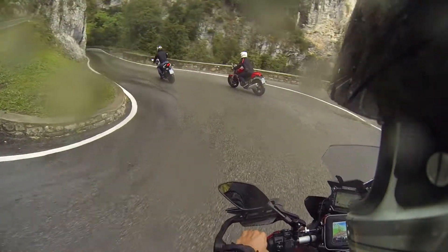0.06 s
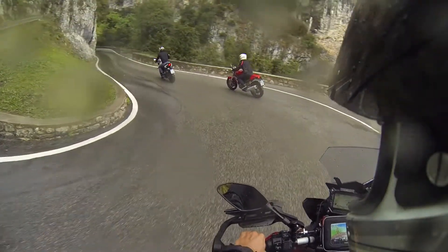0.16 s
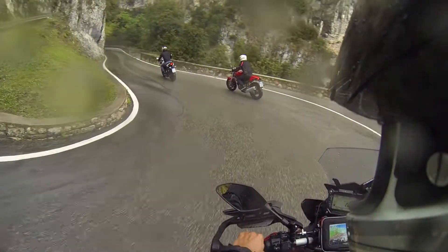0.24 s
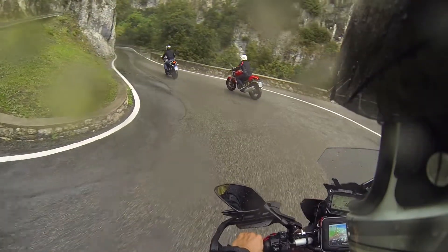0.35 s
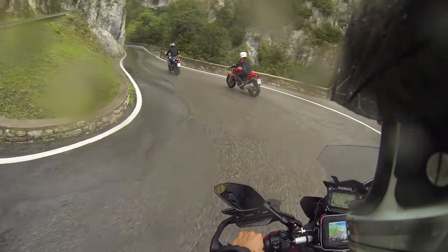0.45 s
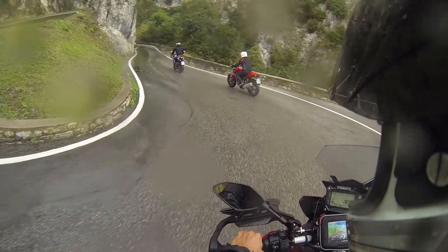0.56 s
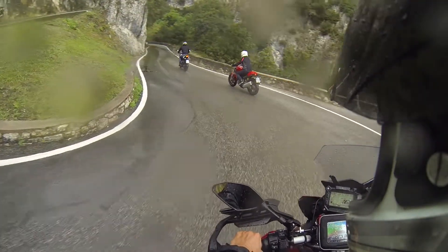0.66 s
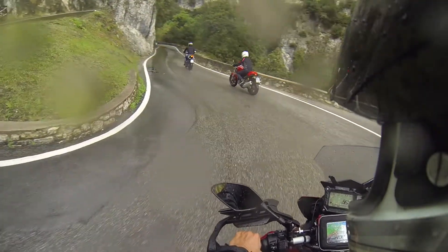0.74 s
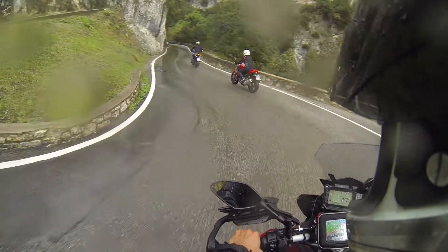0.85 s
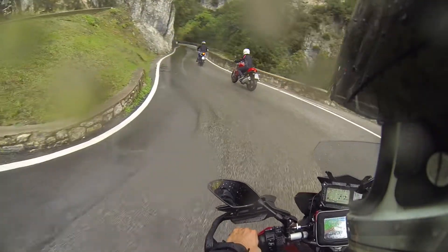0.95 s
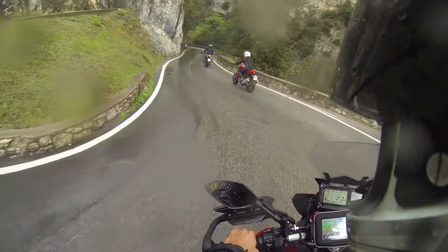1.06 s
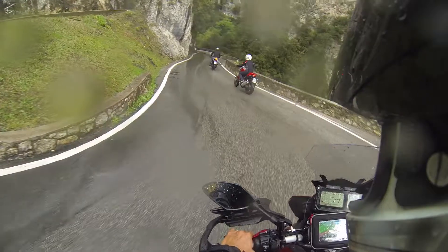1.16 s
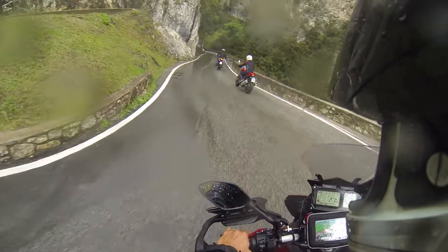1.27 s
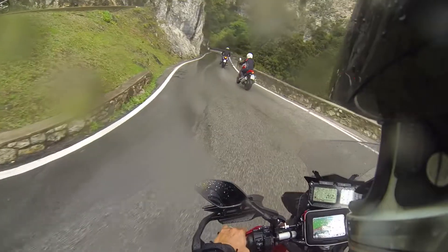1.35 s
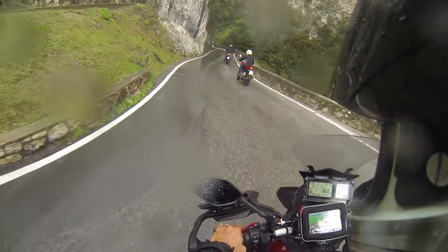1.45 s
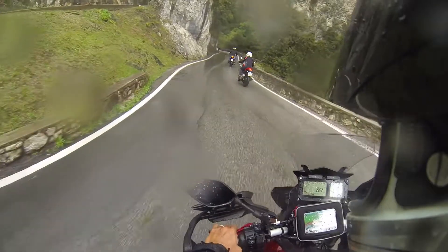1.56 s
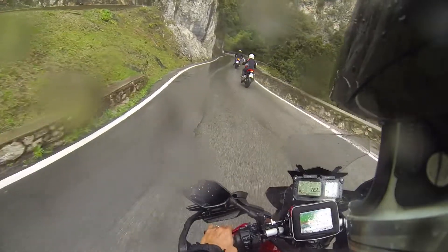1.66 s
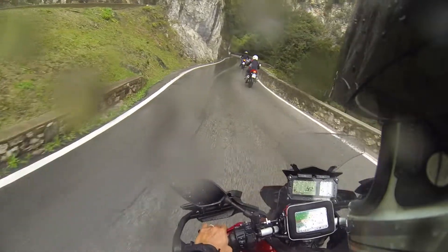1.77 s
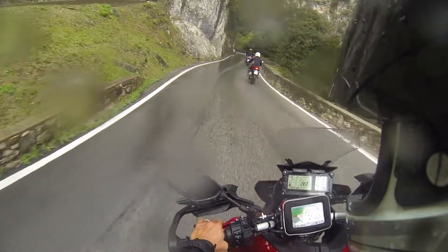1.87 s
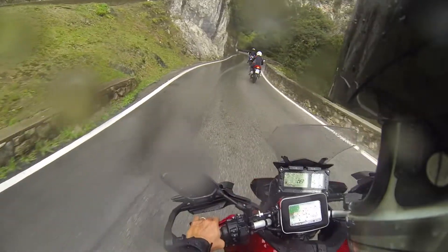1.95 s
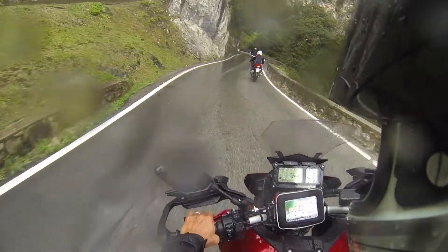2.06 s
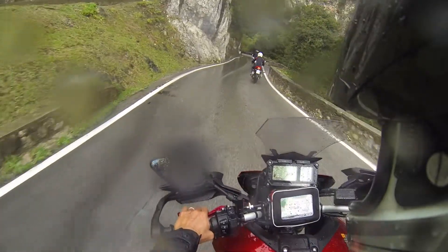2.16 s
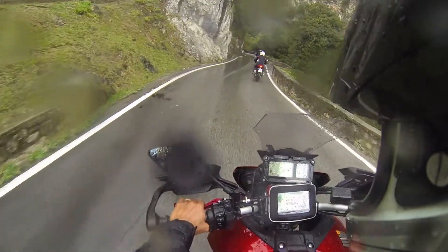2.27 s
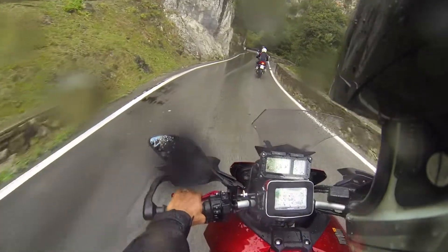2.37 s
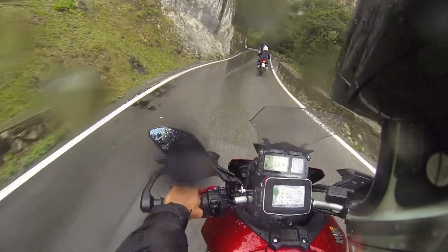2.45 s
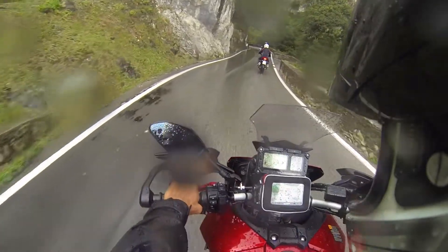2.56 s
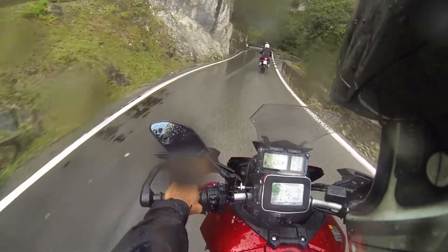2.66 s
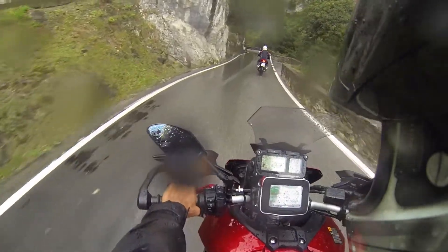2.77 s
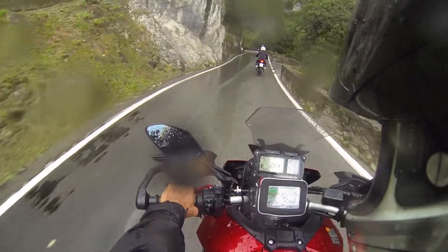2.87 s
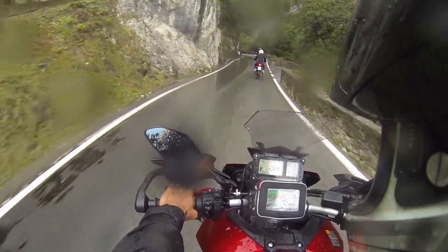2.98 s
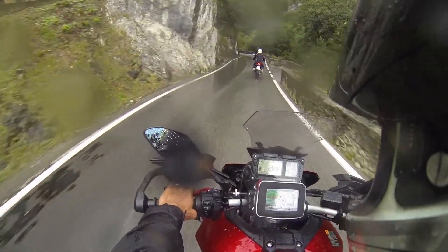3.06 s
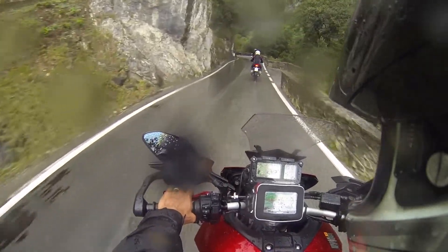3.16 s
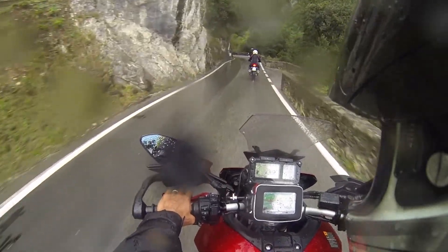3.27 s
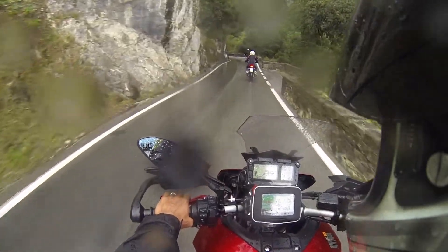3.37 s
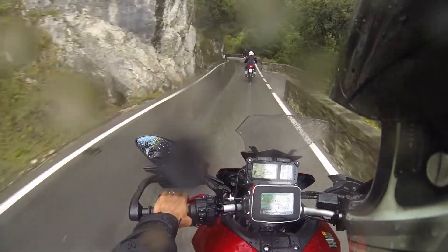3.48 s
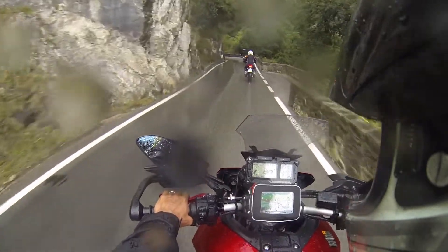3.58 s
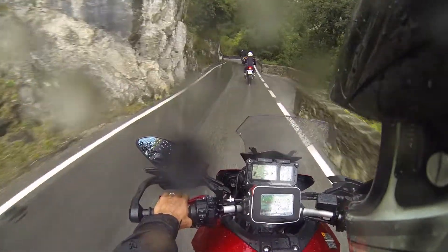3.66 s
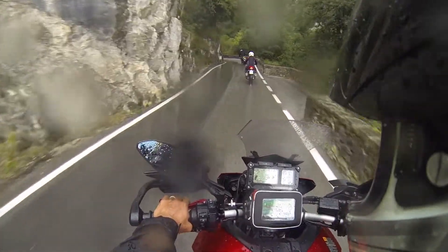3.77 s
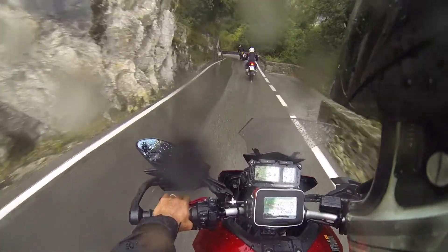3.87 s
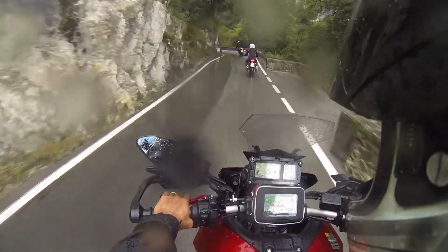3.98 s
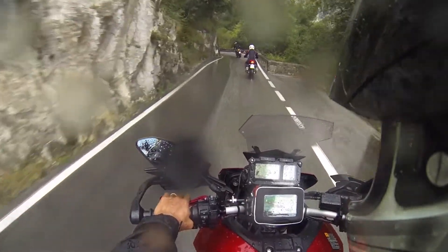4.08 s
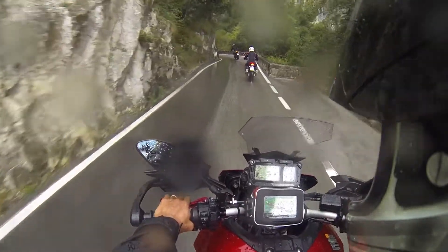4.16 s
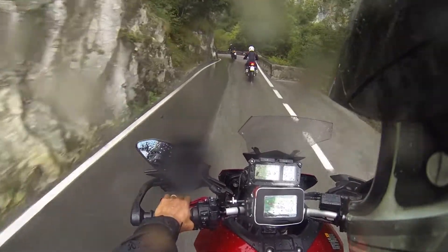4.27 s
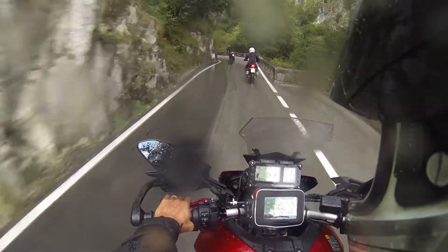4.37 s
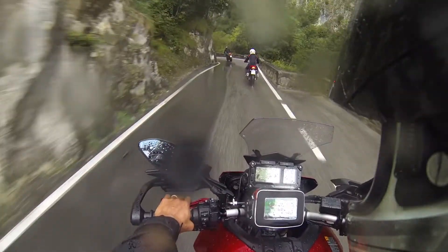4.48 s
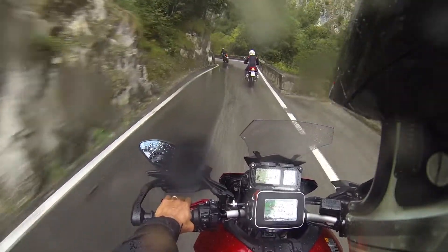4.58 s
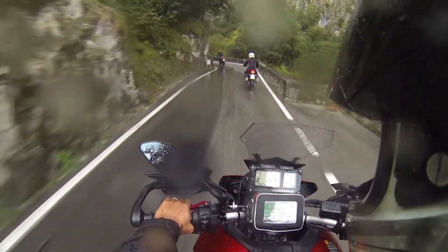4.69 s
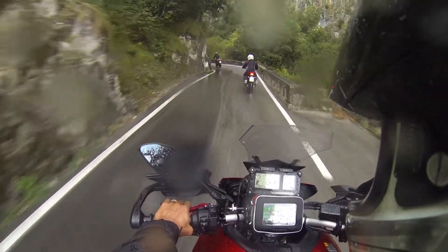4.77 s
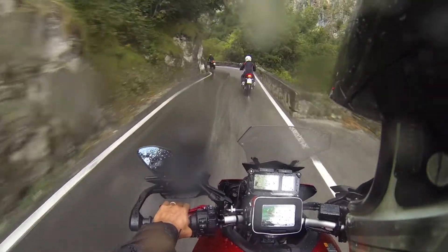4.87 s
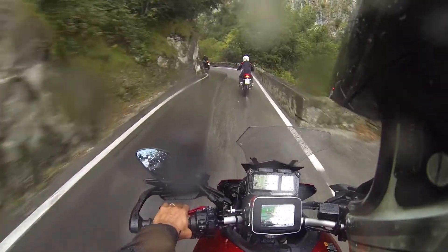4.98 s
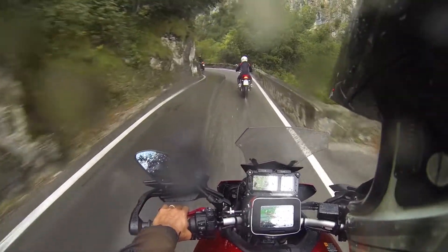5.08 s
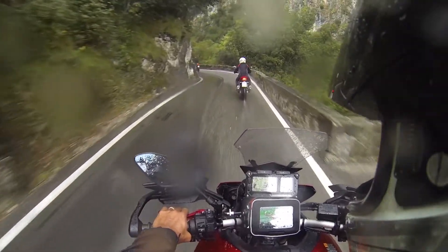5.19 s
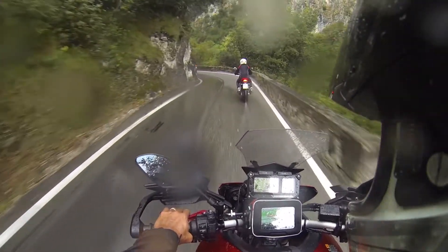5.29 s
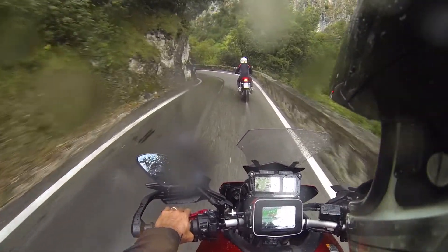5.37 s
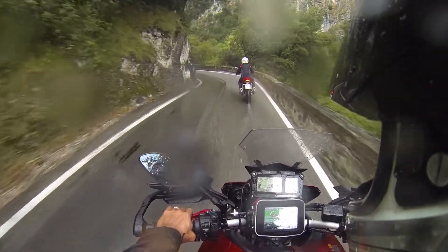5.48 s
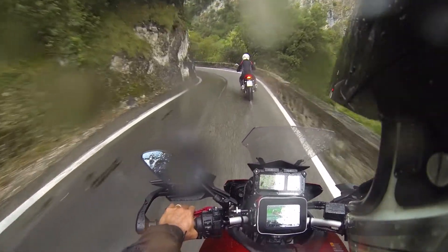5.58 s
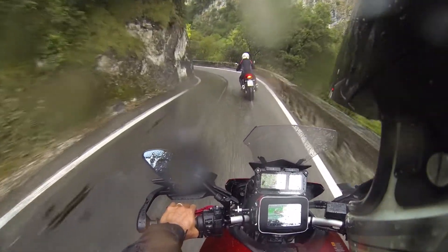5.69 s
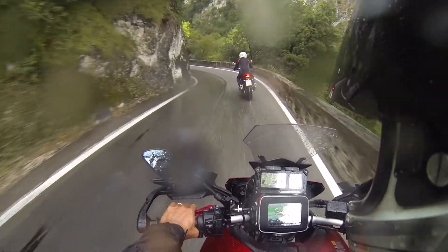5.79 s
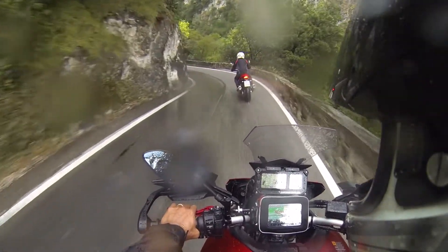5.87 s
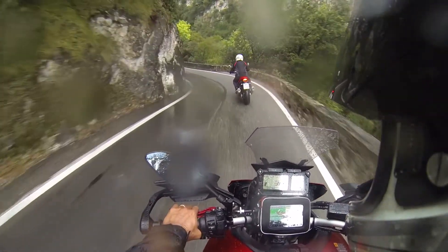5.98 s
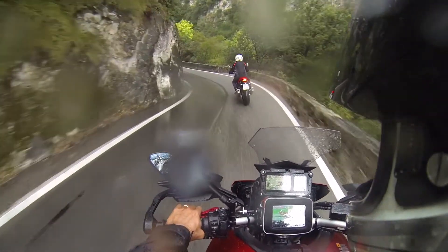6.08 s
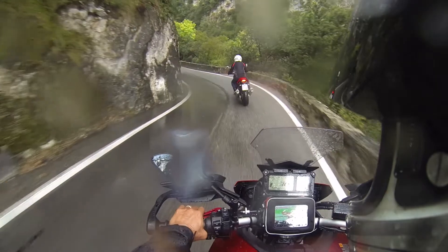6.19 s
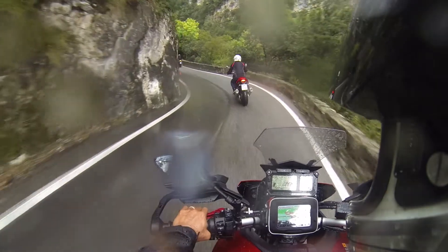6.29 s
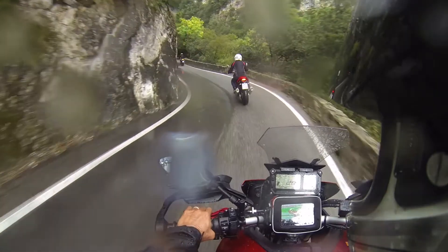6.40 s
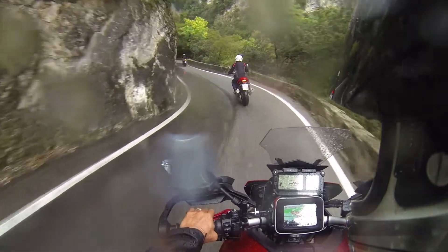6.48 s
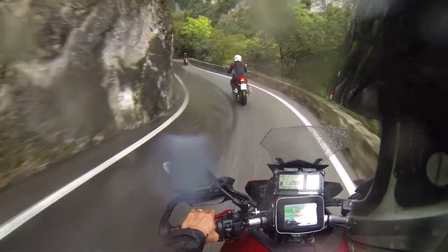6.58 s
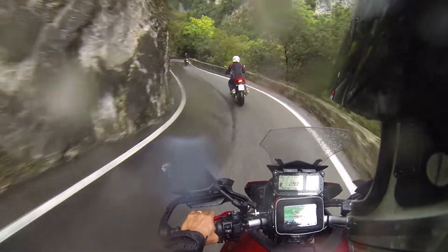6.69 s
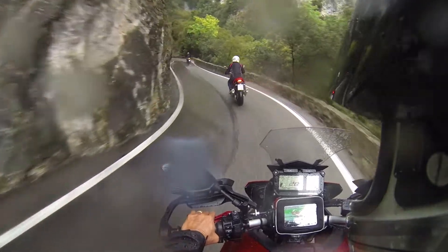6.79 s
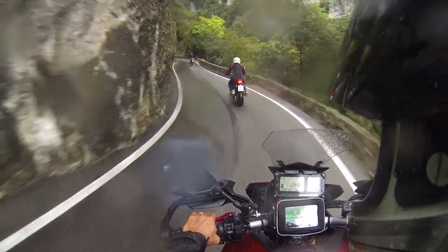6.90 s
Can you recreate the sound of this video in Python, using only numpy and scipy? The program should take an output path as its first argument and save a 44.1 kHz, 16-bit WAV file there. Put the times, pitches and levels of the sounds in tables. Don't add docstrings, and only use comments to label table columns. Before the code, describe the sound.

Close, muffled sound inside a sealed camera housing on a motorcyclist's helmet, on a wet open road. From 0 to 1.1 seconds a low engine drone climbs steadily in pitch, with a faint jittery gear whine above it and even wet tyre hiss. The throttle shuts by about 1.5 seconds; the engine vanishes and the whine fades while coasting. First small ticks and hollow taps appear near 1.7. Wind rises from 2 and swells strongly at 2.7, with deep irregular fluttering thumps, mid roar and airy hiss covering the tyres. From 3 a loose plastic clip clacks and chatters in uneven clusters, with hard snaps near 3.3, 4.0, 4.2 and 5.0 and hollow thuds. Spray fizzes and drops crack, densest from 3.5 to 5.7. Buffeting peaks around 4.7, eases slightly near 6, then swells again with knocks at 6.4 and 6.7 before an abrupt end.

```python
import sys
import numpy as np
from scipy import signal
from scipy.fft import rfft, irfft
from scipy.io import wavfile
from scipy.ndimage import uniform_filter1d

SR = 44100
rng = np.random.default_rng(int(sys.argv[2]) if len(sys.argv) > 2 else 0)


def store_wav(level_fs):
    pcm = np.round(np.clip(np.atleast_2d(level_fs), -1, 1) * 32767)
    wavfile.write(sys.argv[1], SR, pcm.T.astype(np.int16))


def amplitude_ratio(level_db):
    exponent = np.asarray(level_db, float) / 20
    return 10 ** exponent


N = 306054
TIME = np.arange(N) / SR


def evened(x):
    return x / np.sqrt(np.mean(x ** 2) + 1e-20)


def noise():
    return rng.standard_normal(N)


def drift(seconds):
    size = max(int(seconds * SR), 2)
    smooth = uniform_filter1d(noise(), size)
    return evened(uniform_filter1d(smooth, size))


def gusty(flicker_db, seconds):
    return noise() * amplitude_ratio(flicker_db * drift(seconds))


def columns(rows):
    s, *values = np.transpose(rows)
    return [np.interp(TIME, s, v) for v in values]


def phase(hz):
    return 2 * np.pi * np.cumsum(hz * np.ones(N)) / SR


def resonate(x, hz, width):
    turn, r = np.exp(1j * phase(hz)), np.exp(-np.pi * width / SR)
    for _ in range(2):
        x = 2 * (turn * signal.lfilter([1 - r], [1, -r], x / turn)).real
    return x


def coloured(x, spectrum):
    hz = np.fft.rfftfreq(N, 1 / SR)
    f, db = np.transpose(spectrum)
    curve_db = np.interp(np.log(hz + 1), np.log(f + 1), db, -150, -150)
    return evened(irfft(rfft(x) * amplitude_ratio(curve_db), N))


def ring(modes, scrape, rise, size=4000):
    t = np.arange(size) / SR
    x = sum(amplitude_ratio(db - 60 * t / t60) * np.sin(2 * np.pi * hz * t) for hz, t60, db in modes)
    build_up = np.sin(np.pi / 2 * np.minimum(t / rise, 1)) ** 2
    x = np.convolve(x * build_up, scrape)[:size]
    return x / abs(x).max()


def swells(rows):
    return sum(amplitude_ratio(2 * db) * np.exp(-((TIME - s) / half) ** 2) for s, db, half in rows)


# time in seconds, strength in dB.
HEAD_WIND = [(.9, -50.5), (1.25, -52), (1.55, -48), (1.94, -48.5), (2.54, -50), (2.67, -43.5),
             (2.94, -40.5), (3.28, -40.5), (3.62, -38), (4.18, -37.5), (4.45, -38), (4.73, -36),
             (4.96, -36.5), (5.15, -38), (5.81, -39), (6.24, -42), (6.51, -41.5), (6.82, -38)]


def head_wind_db():
    return columns(HEAD_WIND)[0]


# pitch in Hz, wander of the pitch in Hz.
SWAYS = [
    (29, 3.73),
    (66, 8.54),
]
# centre in seconds, strength in dB, half length in s.
PUSHES = [(0.028, -41, 0.027), (0.408, -41.5, 0.16), (0.851, -44.5, 0.14), (1.624, -35, 0.022),
          (1.87, -31, 0.016), (2, -34.5, 0.031), (2.18, -33.5, 0.038), (2.577, -28, 0.068),
          (2.673, -24.5, 0.046), (2.84, -19.5, 0.036), (2.973, -20, 0.012), (3.14, -23.5, 0.029),
          (3.4, -27, 0.45), (3.775, -27, 0.056), (3.903, -25, 0.02), (4.045, -28, 0.066),
          (4.167, -24, 0.026), (4.368, -23, 0.074), (4.53, -24.5, 0.023), (4.655, -18.5, 0.024),
          (4.766, -18, 0.041), (4.932, -21, 0.06), (5.276, -24.5, 0.031), (5.412, -22.5, 0.027),
          (5.526, -24, 0.056), (5.812, -22.5, 0.037), (6.034, -33.5, 0.03), (6.31, -26.5, 0.071),
          (6.59, -33.5, 0.14), (6.783, -23.5, 0.068)]
# centre in seconds, strength in dB, half length in s.
JOLTS = [(0.048, -51, 0.081), (1.783, -40.5, 0.069), (1.873, -42, 0.02), (2.041, -33, 0.057),
         (2.194, -37, 0.021), (2.394, -41.5, 0.12), (2.65, -30.5, 0.052), (2.754, -35, 0.037),
         (2.892, -33.5, 0.075), (3.042, -27, 0.057), (3.2, -33.5, 0.21), (3.656, -28.5, 0.062),
         (3.798, -27.5, 0.022), (4.01, -27.5, 0.041), (4.176, -28, 0.052), (4.375, -26.5, 0.084),
         (4.535, -31.5, 0.035), (4.674, -22.5, 0.026), (4.915, -26.5, 0.037), (5.168, -31.5, 0.2),
         (5.42, -28, 0.041), (5.639, -22.5, 0.018), (5.8, -26.5, 0.042), (6.106, -32.5, 0.051),
         (6.268, -35.5, 0.17), (6.672, -29, 0.018), (6.832, -28, 0.031)]
# frequency in Hz, level in dB per Hz.
NODDING = [(4, -17), (8, -9), (16, -6), (22, -18), (40, -42)]
# frequency in Hz, level in dB per Hz.
RUMBLE = [(47, -50), (80, 0.5), (97, -3), (199, -15), (300, -21), (390, -20.5), (660, -120)]


def mount():
    wind = amplitude_ratio(head_wind_db())
    slow = np.sqrt(swells(PUSHES) + (wind * amplitude_ratio(5)) ** 2)
    quick = np.sqrt(swells(JOLTS) + (wind * amplitude_ratio(1.1)) ** 2)
    rumble = wind * amplitude_ratio(0.9 + 1.54 * drift(0.041)) + amplitude_ratio(-14.5) * quick
    out = rumble * coloured(gusty(0.33, 0.036), RUMBLE)
    out += slow * amplitude_ratio(-14) * coloured(noise(), NODDING)
    for size, (hz, wander_hz) in zip((slow, quick), SWAYS):
        steady = np.sqrt(2) * np.sin(phase(hz + wander_hz * drift(0.02762)))
        free = evened(resonate(noise(), hz, 16.4))
        out += size * (steady + 0.5 * free)
    return out


# frequency in Hz, level in dB per Hz.
ROAR = [(150, -7), (250, -7.5), (305, -5), (356, 0), (510, -9.5), (638, -15), (771, -8.5), (1050, -8),
        (1230, 2.5), (1520, 0.5), (1710, -3), (1870, -19.5), (1950, -14.5), (2540, -16), (4290, -120)]
# frequency in Hz, level in dB per Hz.
HISS = [(1120, -1), (1900, -6.5), (2130, -2.5), (2390, -10), (2680, -1), (3130, -5.5), (3510, -5),
        (4000, -18.5), (4390, -14), (4990, -17.5), (6050, -27), (7660, -28), (9100, -34), (10200, -39.5),
        (10500, -39), (12700, -50), (13400, -46), (14300, -56), (22000, -120)]
BRISK_DB = -40


def wind(puffs):
    roar_db = head_wind_db()
    hiss_db = -47 + (roar_db - BRISK_DB)
    rising = np.clip((TIME - 1.2) / 0.85, 0, 1)
    eddies_db = 2.0 * drift(0.031)
    roar = amplitude_ratio(roar_db + eddies_db + 3.0) * coloured(gusty(1.9, 0.0037), ROAR)
    hiss = amplitude_ratio(hiss_db + 0.81 * eddies_db + 0.95 * puffs + 0.5) * coloured(gusty(0.17, 0.0022), HISS)
    return rising * (roar + hiss)


# pitch in Hz, time to fall 60 dB in seconds, level in dB.
SHELL = [(1280, .011, -4), (1550, .012, 0), (1000, .006, -12), (760, .008, -14)]
HOLLOW = [(362, .075, 0), (450, .03, -5), (640, .014, -3), (900, .014, -1)]
DULL_CLIP = [(2050, .005, -1.5), (2330, .004, -2), (2750, .004, -2), (3150, .004, -3), (3550, .004, -5)]
HIGH_CLIP = [(2200, .004, -6), (2700, .006, 0), (3000, .005, -1), (3350, .005, -2), (3650, .004, -5)]
LATCH = [(4150, .004, -4), (4400, .006, 0), (4750, .004, -5)]
SHARP_EDGE = [(5450, .005, -3), (5900, .005, -1), (6300, .005, 0), (6750, .004, -4)]


def knock(clip, shell_db, clip_db, latch_db, edge_db):
    t, grit = np.arange(300) / SR, rng.standard_normal(300)
    scrape = grit * np.exp(-t / .002) + 2.5 * (t == 0)
    pitch = 1 + .03 * grit[-1]
    clip = [(hz * pitch, t60, db + 1.5 * spot) for (hz, t60, db), spot in zip(clip, grit[-6:])]
    sound = amplitude_ratio(clip_db + 0.5) * ring(clip, scrape, 0.00088, size=800)
    sound += amplitude_ratio(shell_db - 7.0) * ring(SHELL, [1.], .0026, size=800)
    sound += amplitude_ratio(latch_db - 0.5) * ring(LATCH, scrape, 0.00064, size=800)
    sound += amplitude_ratio(edge_db - 2.0) * ring(SHARP_EDGE, scrape, .0013, size=800)
    return sound


# start in seconds, then levels in dB of shell, clip, latch and sharp edge.
CLACKS = [(2.2918, -34, -31, -46, -62), (2.9003, -26, -31, -53, -53), (3.091, -25, -23, -41, -43),
          (3.1809, -27, -30, -53, -48), (3.286, -23, -24, -60, -66), (3.2927, -38, -25, -45, -44),
          (3.3532, -29, -25, -46, -64), (3.4138, -19, -29, -46, -51), (3.4754, -19, -31, -53, -47),
          (3.51, -28, -31, -52, -48), (3.5539, -37, -25, -61, -46), (3.8254, -24, -42, -38, -49),
          (4.063, -38, -30, -72, -42), (4.1321, -20, -26, -55, -49), (4.21, -39, -27, -41, -43),
          (4.305, -29, -32.5, -59, -65), (4.4528, -27, -30, -60, -65), (4.993, -33, -27, -52, -65),
          (5.334, -32, -36, -59, -44), (6.2213, -20, -28, -46, -48), (6.48, -23, -31, -64, -48),
          (6.7079, -12.5, -25, -49, -45)]
SNAPS = [(3.002, -27, -29, -62, -42), (3.261, -6, -20, -40, -33), (3.5688, -32, -48, -55, -52),
         (3.8618, -32, -23, -31, -42), (4.0037, -4.5, -20, -41, -37), (4.0324, -29, -24, -51, -36),
         (4.0423, -26, -38, -60, -44), (4.09, -18, -46, -47, -38), (4.1913, -11, -20.5, -36, -36),
         (4.6087, -32, -44, -58, -36), (4.8477, -13, -25, -43, -40), (5.0382, -10, -25, -43, -31.5),
         (5.154, -21, -35, -36, -47), (5.231, -31, -33, -56, -43), (5.5686, -24, -40, -56, -42),
         (5.7383, -14, -29, -57, -38), (5.7472, -24, -25, -41, -41), (6.165, -41, -28, -53, -43),
         (6.206, -40, -49, -47, -38), (6.2512, -21, -31, -42, -46), (6.356, -41, -28.5, -47, -42),
         (6.4022, -14.5, -24.5, -45, -41)]
TICKS = [(1.7244, -27, -38, -48, -47), (1.734, -23.5, -36, -47, -48), (1.815, -44, -34.5, -46, -46),
         (1.9114, -37, -37, -56, -64), (2.159, -51, -34.5, -50, -55), (2.194, -48, -28.5, -45, -65),
         (2.274, -27, -30, -44, -55), (2.3555, -21, -30.5, -52, -49), (2.721, -42, -30, -64, -68),
         (2.758, -27, -37, -63, -46), (3.4564, -35, -48, -50, -46), (3.497, -38, -31, -46, -48),
         (3.8515, -28, -47, -45, -37), (3.9899, -18, -23, -28, -29), (3.9936, -15.5, -28, -30, -35),
         (4.12, -34, -30, -27, -37), (4.158, -36, -25, -36, -43), (4.7262, -33, -41, -28.5, -35),
         (5.066, -29, -35, -56, -40), (5.4227, -19, -32, -61, -62), (5.9903, -37, -34, -52, -67),
         (6.1983, -27, -32, -34, -33), (6.321, -33, -52, -64, -68)]
# start in seconds, clip level in dB, sharp edge level in dB.
TAPS = [(2.2025, -53, -69), (2.4664, -59, -57), (2.7043, -46, -49), (2.7782, -33, -57), (2.8096, -41, -69),
        (2.844, -44, -56), (2.9209, -35, -66), (3.0141, -51, -54), (3.1349, -28, -53), (3.2526, -28, -50),
        (3.308, -43, -58), (3.3155, -42, -67), (3.3793, -38, -67), (3.4811, -44, -48), (3.748, -43, -53),
        (3.8951, -47, -49), (3.9131, -39, -47), (3.949, -37, -50), (4.3192, -30, -44), (4.4693, -42, -67),
        (4.5536, -27, -45), (4.7128, -43, -41), (4.7731, -27, -60), (4.8071, -42, -61), (4.9034, -31, -63),
        (5.045, -33, -46), (5.2032, -27.5, -44), (5.3493, -31, -68), (5.3912, -37, -52), (5.4292, -38, -52),
        (5.5499, -46, -47), (5.5928, -34, -51), (5.6432, -46, -53), (5.6596, -49, -52), (5.702, -44, -50),
        (5.724, -44, -52), (5.7584, -35, -54), (5.8103, -44, -66), (5.8512, -51, -58), (5.8617, -51, -69),
        (6.0128, -31, -52), (6.1365, -51, -55), (6.1775, -50, -57), (6.2448, -31, -51), (6.2882, -49, -51),
        (6.4703, -43, -70), (6.5222, -38, -68), (6.5995, -47, -55), (6.7207, -29, -64), (6.7786, -43, -70),
        (6.8005, -34, -64), (6.8145, -36, -55), (6.8429, -30, -50), (6.8569, -40, -63), (6.8654, -47, -56)]
# start in seconds, level in dB.
THUDS = [(1.7233, -34), (1.734, -26), (2.1955, -31), (2.2935, -28.5), (2.3563, -33), (2.721, -35),
         (3.2919, -31), (3.4766, -22), (3.5082, -21), (3.5539, -23.5), (3.825, -37), (3.8611, -22),
         (3.9933, -15), (4.0042, -22), (4.1196, -23), (4.1326, -21), (4.6085, -47), (4.7273, -21),
         (5.155, -31), (5.4212, -23.5), (5.5704, -28), (5.749, -21), (6.199, -25.5), (6.223, -25.5),
         (6.7063, -32)]


def clip_knocks():
    out = np.zeros(N + 4000)
    rows = [(DULL_CLIP, *row) for row in list(CLACKS) + list(SNAPS)]
    rows += [(HIGH_CLIP, *row) for row in TICKS]
    for k, (s, db, edge_db) in enumerate(TAPS):
        rows.append(((DULL_CLIP, HIGH_CLIP)[k % 2], s, db + 2, db, db - 7, edge_db))
    hollow = ring(HOLLOW, [1.], 0.00047)
    for clip, s, shell_db, *other_db in rows:
        start = round(s * SR)
        out[start:start + 800] += knock(clip, shell_db, *other_db)
        out[start:start + 4000] += amplitude_ratio(shell_db - 19) * hollow
    for s, db in THUDS:
        start = round(s * SR)
        out[start:start + 4000] += amplitude_ratio(db + 1.0) * hollow
    dulling = signal.butter(10, 7200, fs=SR, output="sos")
    return signal.sosfilt(dulling, out[:N])


def chatter():
    ticks = (rng.random(N) < 70 / SR) * amplitude_ratio(2.5 * rng.exponential(1, N))
    ticks = signal.oaconvolve(ticks, np.exp(-np.arange(200) / 8.0))[:N] * noise()
    parts = [(SHELL, 0), (DULL_CLIP, -8), (SHARP_EDGE, -22), (HOLLOW, -12)]
    body = sum(amplitude_ratio(db) * ring(modes, [1.], 0.00025) for modes, db in parts)
    sound = evened(signal.oaconvolve(ticks, body)[:N])
    return amplitude_ratio(head_wind_db() - 15) * sound * (TIME > 2.6)


# start in seconds, strength in dB, fade in seconds.
SPLASHES = [(2.8, -79, 0.14), (3.05, -68, .1), (3.27, -64, 0.059), (3.61, -66, .03), (3.7, -58.5, 0.028),
            (3.52, -68, 0.025), (3.88, -67, 0.07), (4.1, -58, .03), (4.16, -45.5, 0.0089),
            (4.24, -65, 0.064), (4.76, -61, 0.073), (5.04, -59, 0.016), (5.102, -66, 0.012),
            (5.18, -62, 0.062), (5.43, -64, 0.015), (5.64, -60, 0.054), (6.68, -65, 0.056),
            (6.831, -58, 0.016)]


def wetness():
    wet = amplitude_ratio(-71 + 2 * (head_wind_db() - BRISK_DB))
    for s, db, fade in SPLASHES:
        slope_s = np.where(TIME < s, 0.0066, fade)
        wet = wet + amplitude_ratio(db) * np.exp(-abs(TIME - s) / slope_s)
    return wet


# time in seconds, level in dB.
LARGE_DROPS = [(3.071, -55), (3.142, -55), (3.484, -54), (3.537, -54), (3.563, -53), (3.602, -57),
               (3.613, -51), (3.622, -57), (3.671, -54), (3.687, -51), (3.699, -50), (3.714, -55),
               (3.734, -54), (3.81, -51), (3.85, -51), (3.898, -52), (3.917, -54), (3.948, -49),
               (3.983, -50), (3.993, -55), (4.017, -60), (4.095, -49), (4.124, -54), (4.159, -47),
               (4.173, -59), (4.191, -55), (4.228, -54), (4.238, -54), (4.277, -54), (4.288, -53),
               (4.389, -50), (4.455, -53), (4.536, -51), (4.662, -48), (4.702, -48), (4.73, -50),
               (4.759, -47), (4.775, -53), (4.789, -50), (4.808, -49), (4.842, -49), (4.865, -49),
               (4.903, -55), (4.926, -50), (5.002, -54), (5.013, -54), (5.033, -52), (5.046, -46),
               (5.083, -54), (5.096, -52), (5.179, -55), (5.19, -48), (5.231, -56), (5.274, -53),
               (5.429, -50), (5.644, -46), (5.656, -58), (5.673, -53), (6.828, -55), (6.853, -53)]
# pitch in Hz, width in Hz, level in dB.
WINDOW = [(11330, 1340, 3.5), (12030, 730, -20), (10000, 1200, -5.5), (8000, 1900, -5.5), (13300, 600, -20)]


def spray(puffs):
    drops = (rng.random(N) < 3000 / SR) * noise()
    drops *= wetness() * amplitude_ratio(4.5 * puffs + 4 * drift(0.0015) - 1.5)
    cracks = np.zeros(N)
    s, crack_db = np.transpose(LARGE_DROPS)
    cracks[np.round(s * SR).astype(int)] = amplitude_ratio(crack_db - 12.0)
    burst = np.exp(-(np.arange(-400, 401) / (.0025 * SR)) ** 2)
    drops += signal.oaconvolve(cracks, burst, "same") * noise()
    fizz = sum(amplitude_ratio(db) * resonate(drops, hz, width) for hz, width, db in WINDOW)
    return amplitude_ratio(17.0) * fizz * (TIME > 2.5)


# time in seconds, firing rate in Hz, throttle in dB, load on the gears in dB.
ENGINE = [
    (0.0, 66.5, -54.5, -59),
    (.2, 71.75, -54, -55),
    (.37, 76.7, -55, -57),
    (.5, 80, -56.5, -58.5),
    (.68, 85.5, -51.5, -55),
    (.9, 89.2, -53.5, -51),
    (1.13, 92.9, -59.5, -54),
    (1.55, 90.6, -66, -58),
    (2.2, 86.2, -70, -59),
]
# frequency in Hz, level in dB.
PIPE = [(130, 1.5), (180, -3.5), (205, -4), (245, -9.5), (280, -9), (305, -10), (340, -5.5), (390, -23)]


def engine():
    hz, throttle_db, _ = columns(ENGINE)
    angle = phase(hz * (1 + .006 * drift(.02)))
    f, pipe_db = np.transpose(PIPE)
    orders = 0
    for k in np.arange(3, 12) / 2:
        level_db = np.interp(k * hz, f, pipe_db, right=-25) - 25 * (k % 1)
        orders = orders + amplitude_ratio(level_db + 2.6 * drift(0.066)) * np.sin(k * angle)
    hum = amplitude_ratio(-51) * evened(resonate(noise(), 112.2, 14.0))
    return (2.3 * amplitude_ratio(throttle_db) * orders + hum) * np.clip((1.45 - TIME) / .15, 0, 1)


def gear():
    firing_hz, _, load_db = columns(ENGINE)
    hz = 30.6 * firing_hz
    load_db = load_db - 60 * np.clip(TIME - 2.3 + 0.61, 0, 1)
    line = np.sin(phase(hz * (1 + .004 * drift(.015)))) * amplitude_ratio(1.8 * drift(.02))
    line *= 1 + .6 * np.sin(phase(hz) / 20.4)
    fuzz = resonate(gusty(1.5, .02), hz, 200)
    return amplitude_ratio(load_db) * evened(.7 * evened(line) + evened(fuzz))


# a spectrum of (frequency in Hz, level in dB per Hz), band level in dB.
ROAD = [
    ([(150, -42), (250, -11), (296, -5.5), (339, -18), (379, -13), (532, -9.5), (584, -13.5), (641, -5), (722, -13), (939, -5.5), (1010, -9.5), (1340, 2), (1900, -8), (2470, -78), (4180, -120)], -48.5),
    ([(1900, -45), (2020, -3.5), (2150, -0.5), (2450, -5), (2700, 0), (3300, -4.5), (3900, -16), (4100, -40)], -52),
    ([(2350, -20), (4000, -0.5), (4490, -1.5), (4940, 0), (5300, -3.5), (5690, -8.5), (5970, -10.5), (6610, -6), (7070, -10), (7710, -7), (8600, -17), (11200, -50), (18900, -120)], -66),
    ([(8400, -42.5), (8700, -3), (10000, 2.5), (12500, -3), (13000, -6), (13300, 4), (13800, -4), (14100, -10), (15000, -14)], -75),
]


def road():
    fade = amplitude_ratio(np.interp(TIME, [0, 1.2, 2.2, 6.9], [-1.1, -0.7, -3.5, -12.0]))
    high_fade = amplitude_ratio(np.interp(TIME, [0, .6, 1.35, 1.7, 2.5], [2.6, 4.0, 5.2, 1.1, 2.5]))
    low, middle, high, top = (amplitude_ratio(db) * coloured(gusty(0.94, 0.015), spectrum) for spectrum, db in ROAD)
    return fade * (low + middle) + high_fade * high + top


def circuit_whine():
    level = np.sqrt(2) * amplitude_ratio(-78.5 + 1.0 * drift(0.027))
    return level * np.sin(2 * np.pi * 10643 * TIME + 0.96 * drift(.02))


def scene():
    puffs = np.tanh(1.5 * drift(.009))
    helmet = mount() + wind(puffs) + clip_knocks() + chatter() + spray(puffs)
    return (helmet + engine() + gear() + road() + circuit_whine())[None]


def band_limit(x):
    return signal.sosfilt(signal.butter(12, 15080, fs=SR, output="sos"), x)


def record(dry):
    edge = signal.firwin(255, 15250, window=("kaiser", 9), fs=SR)
    mix = signal.oaconvolve(dry, edge[None], "same")
    return band_limit(mix)


dry = scene()
out = record(dry)
store_wav(out)
```